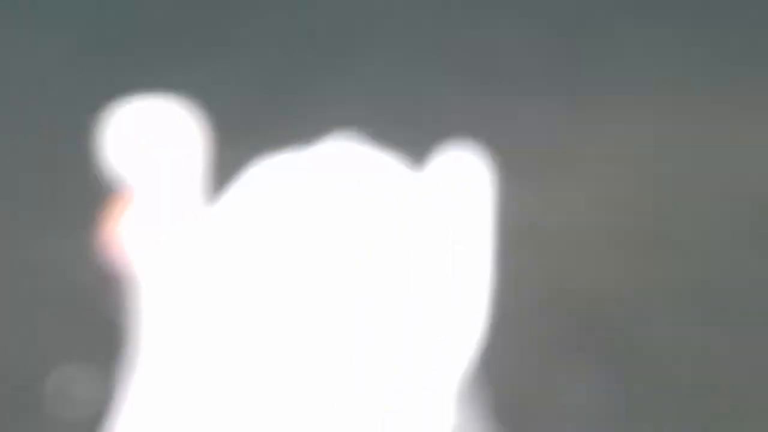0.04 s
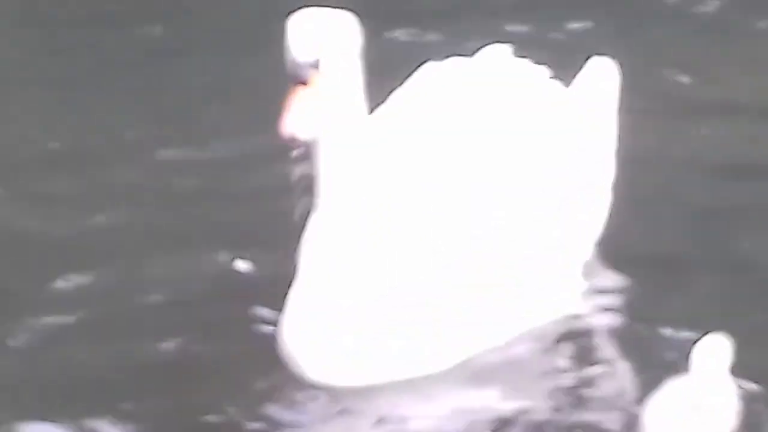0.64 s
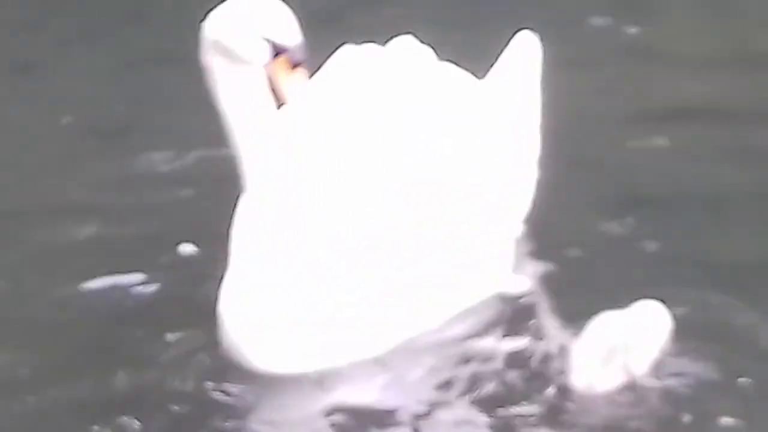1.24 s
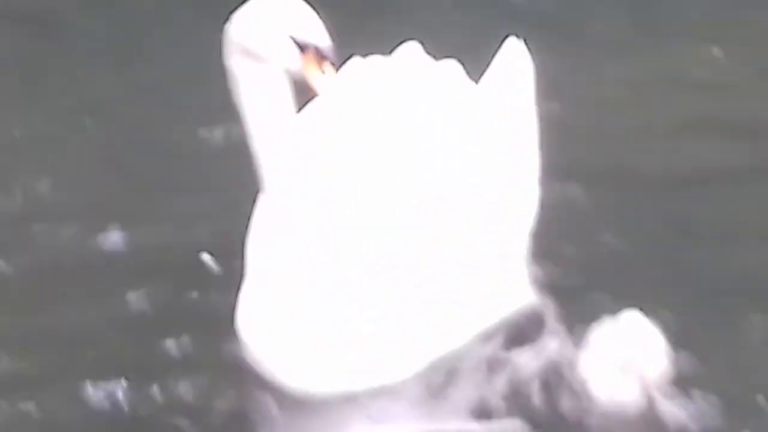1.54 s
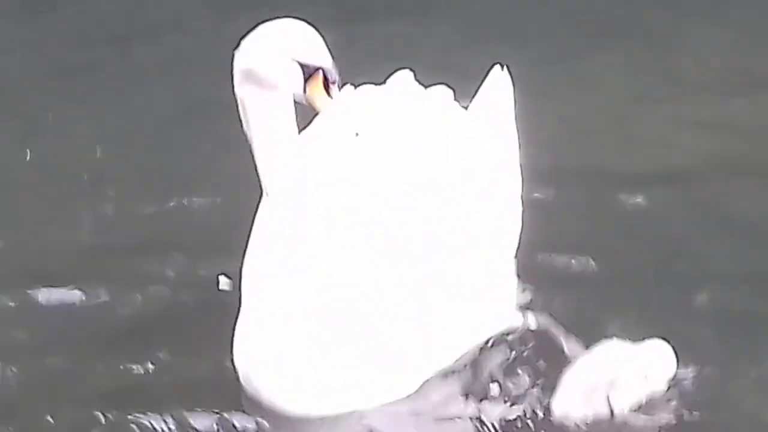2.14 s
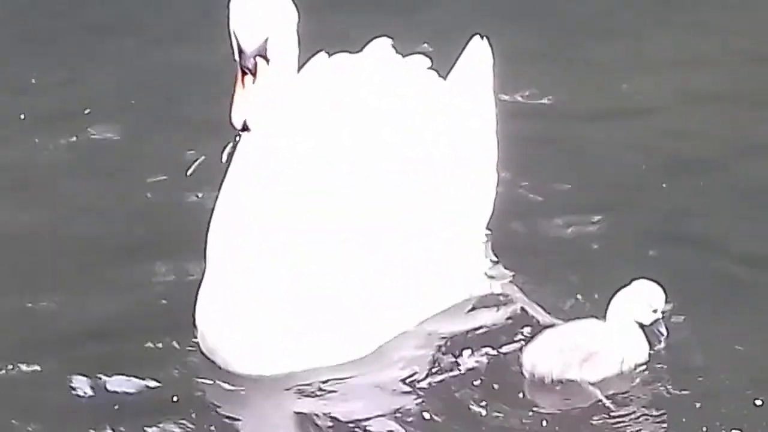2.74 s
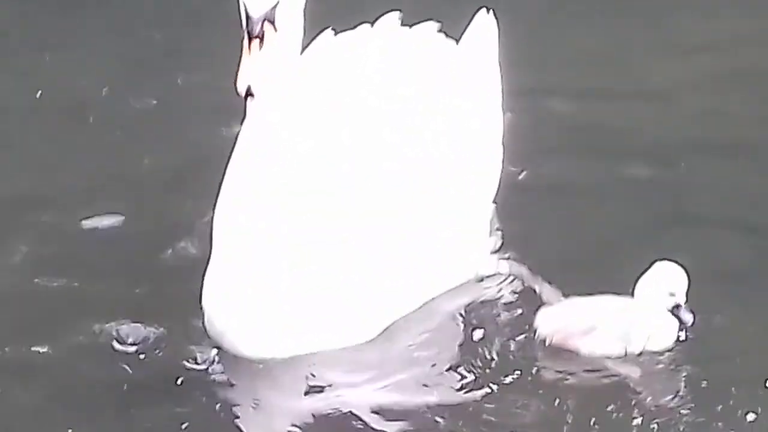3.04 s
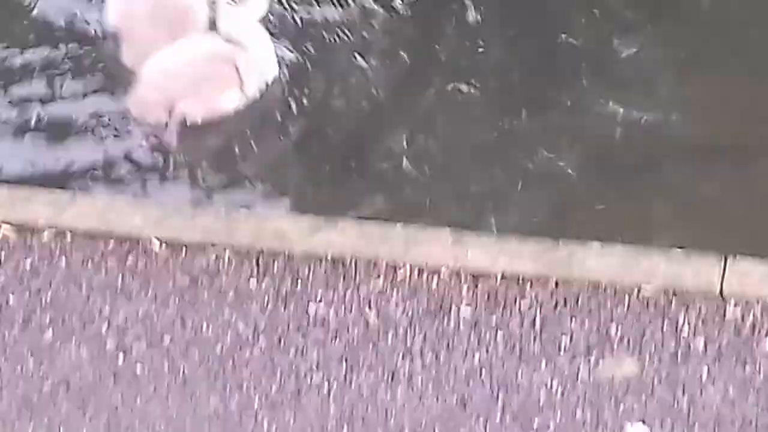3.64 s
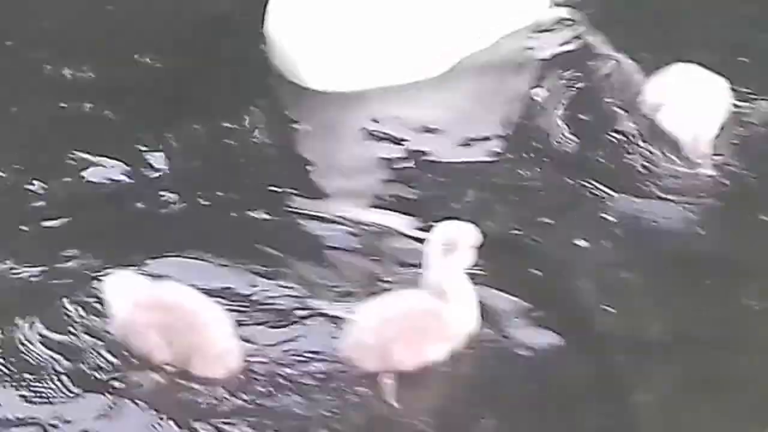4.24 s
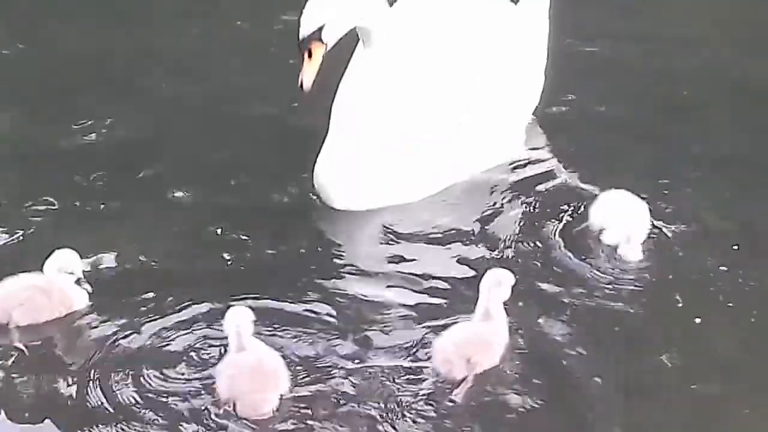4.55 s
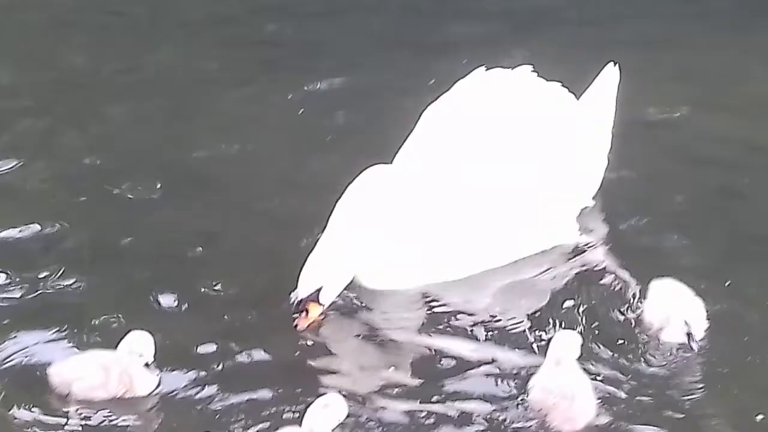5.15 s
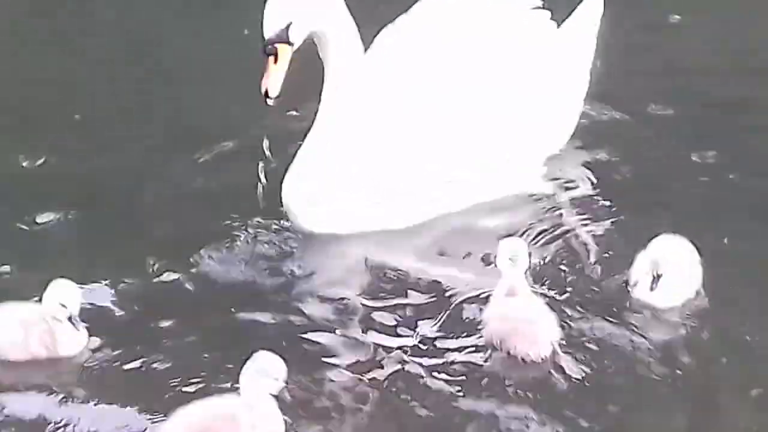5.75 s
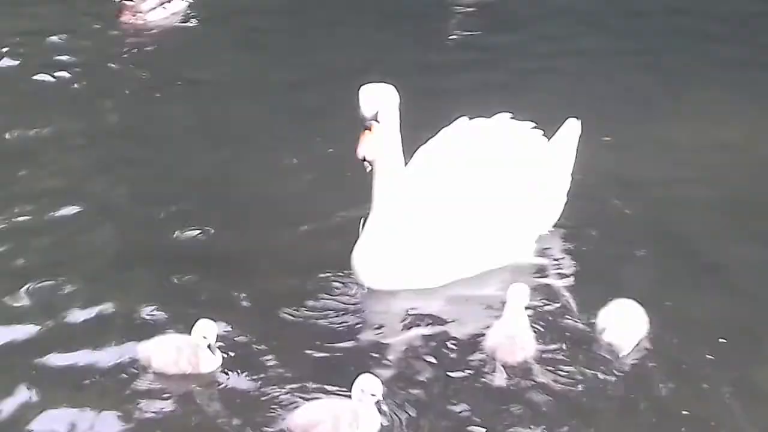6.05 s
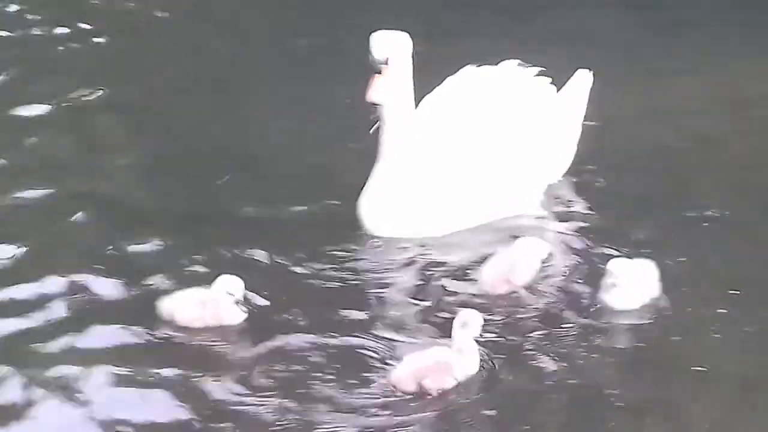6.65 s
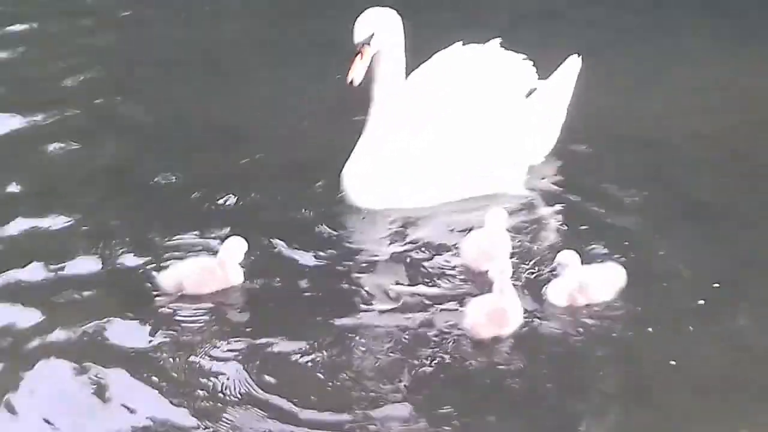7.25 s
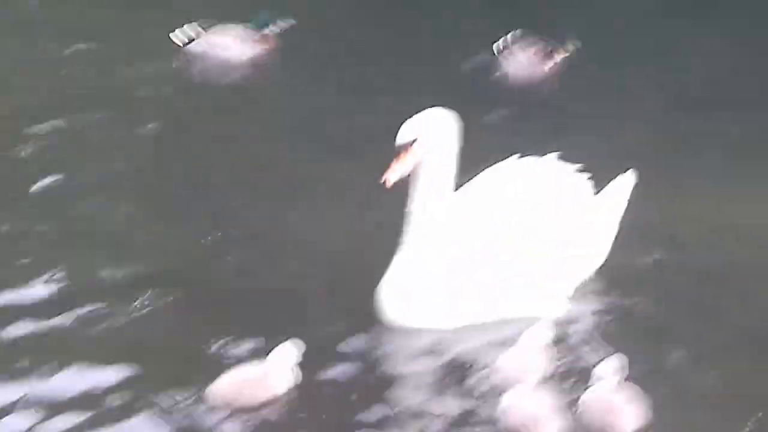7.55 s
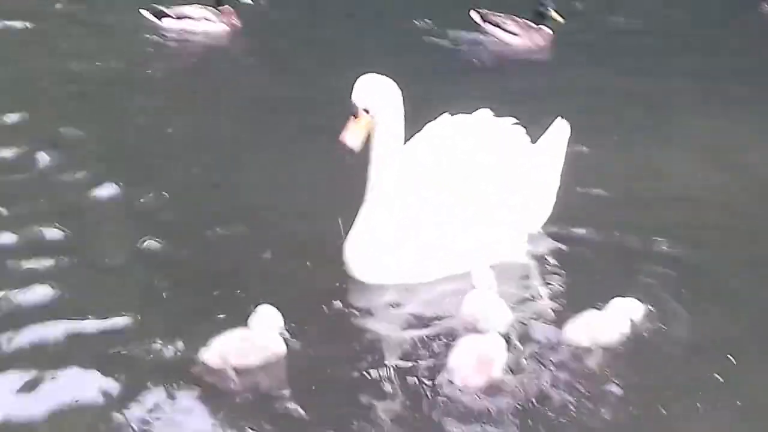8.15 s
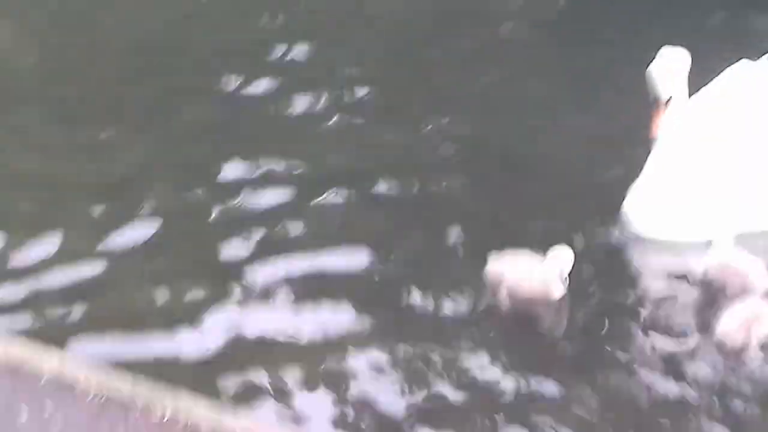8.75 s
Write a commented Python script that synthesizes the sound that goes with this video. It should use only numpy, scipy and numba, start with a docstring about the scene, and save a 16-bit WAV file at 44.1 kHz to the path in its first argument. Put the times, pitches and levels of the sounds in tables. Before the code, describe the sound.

Ducks quack in rapid, rasping chatter at a pond, with bill clicks, thin bird whistles and a few water plops.

```python
"""Ducks at a pond

Short rasping quacks, each a run of about 95 puffs a second ringing the windpipe and throat.
Bills click, more ducks answer further out, thin bird whistles and chirps glide over them, water plops.
Near the end the hand-held microphone is bumped and rubbed."""
import sys
import numpy as np
from scipy import signal
from scipy.fft import rfft, irfft, next_fast_len
from scipy.io import wavfile
from scipy.ndimage import uniform_filter1d
from numba import njit

SR = 44100
rng = np.random.default_rng(int(sys.argv[2]) if len(sys.argv) > 2 else 0)


def transcribe(u):
    """Save the signal u as a 16-bit wav file named by the first command-line argument.

    u: samples, shape (n,) or (channels, n), limited to [-1, 1]; the rate is SR.
    q: integer samples, one column per channel.
    """
    v = np.clip(np.atleast_2d(u).T, -1, 1)
    q = np.round(v * 32767).astype(np.int16)
    wavfile.write(sys.argv[1], SR, q)


N = 396459
TIME_S = np.arange(N) / SR

# (frequency [Hz], gain [dB])
VOICE_EQ = [(700, -16.5), (1300, -6), (1450, -5), (1650, 1), (2600, -1), (3100, -1.5), (3700, -5),
            (4400, 3), (5200, -5), (6200, -6), (7000, -16), (8000, -25.5), (11000, -42.5)]

def quack(length_s, puff_hz, throat_hz, bright_db, lag_ms, width_hz=418.0, leak=0.32):
    """Puffs of rasp ring windpipe and throat; resonances rise and fall as the bill opens and shuts."""
    t = np.arange(SR // 4) / SR - 1 / 8
    opening = np.cos(np.pi * np.clip(t / length_s, -.5, .5)) + 1e-9
    cycle = puff_hz * t * (1 - .5 * t) + .035 * wander(90, len(t)) + .5
    # successive puffs are alike, never identical
    rasp, fresh = rng.standard_normal((2, len(t)))
    repeated = rasp[(cycle % 1 * SR / puff_hz).astype(int)]
    source = np.sqrt(.79) * repeated + np.sqrt(.21) * fresh
    # windpipe echoes: a comb of nasal peaks
    lag_s = lag_ms / 1000 * (1 - .11 * (opening - .8))
    nasal = sum(.8 ** k * np.interp(t - k * lag_s, t, source) for k in range(3))
    voice = resonance(nasal, throat_hz * (1 + .27 * (opening - .8)), width_hz)
    # steady air pressure evens out the puffs
    power = np.abs(uniform_filter1d(voice ** 2, int(SR * .0049)))
    voice /= np.sqrt(power + 1e-12)
    puffs = leak + np.abs(np.sin(np.pi * cycle)) ** 1.68
    voice *= puffs * opening ** .93 * undb(1.75 * wander(90.1, len(t)))
    voice = colour(voice, VOICE_EQ)
    # treble peaks with the bill wide open
    body = colour(voice, [(2800, -2), (4000, -14)])
    voice = body + (voice - body) * undb(bright_db + 14 * (opening - 1.08))
    return voice / np.sqrt(np.sum(voice ** 2) / (length_s * SR))


# (centre [s], length [s], relative level [dB], puff rate [Hz], throat resonance [Hz], brightness [dB])
NEAR_QUACKS = [(0.024, 0.079, -32.5, 111, 2167, 4.5), (0.224, 0.077, -34, 82, 2060, 2),
               (0.424, 0.087, -45.5, 105, 3970, -23), (0.521, 0.085, -31, 102, 2290, 0),
               (0.647, 0.085, -40.5, 76, 3860, -24), (0.734, 0.1, -33, 91, 2140, -4),
               (0.909, 0.043, -40, 53, 1860, -14), (1.01, 0.091, -30.5, 105, 2275, 3.5),
               (1.093, .073, -29.5, 88, 2326, -16), (1.218, 0.12, -32.5, 84, 2160, 1.5),
               (1.433, 0.078, -44.5, 92, 3840, -19), (1.451, 0.22, -40, 95, 1640, -16),
               (1.644, 0.076, -28.5, 105, 2390, -6), (1.791, 0.042, -42.5, 69, 1730, -20),
               (1.909, 0.091, -39.5, 99, 2213, -7), (2.069, 0.068, -31.5, 62, 1830, -3),
               (2.155, 0.071, -32.5, 96, 2223, 2), (2.334, 0.085, -31, 85, 1960, 0),
               (2.578, 0.082, -31, 74, 1980, -3.5), (2.69, 0.069, -29.5, 83, 2300, 4.5),
               (2.766, 0.11, -40, 105, 2325, -22), (2.87, 0.086, -34.5, 74, 2317, -1.5),
               (2.919, 0.086, -32.5, 100, 2060, -2), (3.011, 0.085, -28.5, 93, 1840, -2),
               (3.154, .087, -31, 110, 2100, 5), (3.244, 0.075, -27, 111, 2100, 0.5),
               (3.393, 0.076, -29, 88, 2040, -1.5), (3.464, 0.072, -28.5, 98, 2010, -7.5),
               (3.687, 0.055, -27.5, 78, 2140, -8), (3.768, 0.062, -27, 80, 1950, -8),
               (3.976, 0.07, -30.5, 103, 2198, 5), (4.063, .1, -40.5, 86, 2180, -13),
               (4.179, .088, -26, 90, 2163, -0.5), (4.424, 0.074, -24, 97, 2186, -3),
               (4.588, 0.068, -27.5, 86, 1910, -15), (4.813, 0.061, -25.5, 92, 2015, -14),
               (5.028, 0.083, -27, 88, 1810, -4), (5.233, 0.088, -40, 65, 1660, 7),
               (5.397, 0.067, -28.5, 92, 1870, -5.5), (5.593, .1, -29.5, 89, 2050, 2),
               (5.776, 0.1, -36, 76, 2170, -10), (5.967, 0.1, -28.5, 71, 2005, -6),
               (6.162, 0.081, -27.5, 90, 1985, -8), (6.354, .1, -27.5, 82, 2010, -3),
               (6.565, 0.083, -36, 77, 1950, -9.5), (6.711, 0.074, -28, 95, 1910, -7),
               (6.914, 0.11, -29.5, 104, 1930, -4), (6.97, .074, -28.5, 110, 2316, -9),
               (7.037, 0.065, -36, 86, 2363, 2), (7.205, 0.086, -25.5, 110, 2494, -7),
               (7.285, 0.094, -29, 82, 1960, -3.5), (7.487, 0.066, -29, 66, 2000, -3),
               (7.792, 0.07, -32, 91, 2770, 0.5), (8.042, 0.068, -32.5, 108, 2390, 5),
               (8.363, 0.044, -40.5, 50, 1720, -2), (8.727, 0.15, -37, 102, 1900, 3),
               (8.938, 0.033, -38, 105, 2010, 9)]
# (throat resonance [Hz], echo lag [ms])
WINDPIPE_LAGS = [(1850, 1.0815), (2150, 1.149), (2380, 1.527), (3900, 0.936)]

def near_ducks(lag_scatter=0.14):
    """Ducks by the bank; the windpipe stretches a little differently for each quack."""
    out = np.zeros(N)
    stretches = 1 + lag_scatter * rng.uniform(-1, 1, len(NEAR_QUACKS))
    for (centre_s, length_s, db, puff_hz, throat_hz, bright_db), stretch in zip(NEAR_QUACKS, stretches):
        lag_ms = np.interp(throat_hz, *np.transpose(WINDPIPE_LAGS)) * stretch
        call = quack(length_s, puff_hz, throat_hz, bright_db, lag_ms)
        add(out, centre_s - 1 / 8, undb(db - 1) * call)
    return out


# (frequency [Hz], gain [dB])
BILL_EQ = [(1000, -26), (2500, -6), (4600, 3.5), (6000, -18.5), (8000, -22), (14000, -60)]

def bills(lead_s=0.045, scatter_db=8.5, stray_count=16):
    """The bill snaps open ahead of each near quack's centre; feeding birds add stray clicks."""
    offsets_db = -9 + scatter_db * rng.uniform(-1, 1, len(NEAR_QUACKS))
    snaps = [(centre_s - lead_s, db + offset_db)
             for (centre_s, _, db, *_), offset_db in zip(NEAR_QUACKS, offsets_db)]
    strays = [(when * N / SR, -38 - scatter_db * soft) for when, soft in rng.random((stray_count, 2))]
    return clicks(snaps, BILL_EQ, decay_s=0.0031) + clicks(strays, BILL_EQ, decay_s=0.0015)


# (time [s], relative level [dB])
FLOCK_LEVELS = [(0, -40), (1.4, -47.5), (1.7, -50.5), (2.0, -38.5), (2.5, -47), (3.4, -46), (4.0, -43.5),
                (4.9, -38.5), (5.4, -42), (6.25, -48.5), (7.1, -44.5), (7.4, -56.5), (7.62, -40),
                (7.75, -53.5), (8.99, -47)]

def far_ducks(count=70):
    """Overlapping quacks across the water, duller, each with its own voice."""
    out = np.zeros(N)
    for k, (when, length, rate, throat, lag, loud) in enumerate(rng.uniform(-1, 1, (count, 6))):
        call = quack(length_s=.15 + .08 * length, puff_hz=95 + 14 * rate,
                     throat_hz=1950 * (1 + .17 * throat), bright_db=-9,
                     lag_ms=1.2 + .3 * lag, width_hz=700.0, leak=.077)
        start_s = (k + when / 4) / count * N / SR - 1 / 16
        add(out, start_s, undb(2 * loud) * call)
    return unit(out) * undb(np.interp(TIME_S, *np.transpose(FLOCK_LEVELS)) - 1)


# (start [s], length [s], fundamental [Hz], climb [share of pitch], relative level [dB])
WHISTLE_CALLS = [(0.036, 0.63, 1266, 0.099, -54), (1.099, 0.47, 1057, 0.025, -47),
                 (2.19, 0.52, 1240, 0.036, -52.5), (3.503, 0.44, 1130, -0.054, -56),
                 (4.232, 0.27, 1130, 0.042, -52), (5.10, 0.56, 1133, -0.048, -52),
                 (6.406, .25, 1150, 0, -51.5), (7.871, 0.26, 1162, .17, -47)]
# (frequency [Hz], gain [dB])
THROAT_EQ = [(1900, 3), (2250, -1), (2600, -9), (3200, -28), (3450, -17), (3700, -3), (4000, -9.5),
             (4400, -6), (5400, -13.5)]

def whistles(scoop_s=0.028, droop_s=0.022, waver_hz=4.2, flutter_db=3.0):
    """Thin calls scoop up, waver along a slow glide and droop; the throat picks out harmonics 2-4."""
    out = np.zeros(N)
    throat_hz, throat_db = np.transpose(THROAT_EQ)
    for start_s, length_s, pitch_hz, climb, db in WHISTLE_CALLS:
        t = np.arange(int(length_s * SR)) / SR
        u = t / length_s
        scoop = .0389 * np.exp(-t / scoop_s)
        droop = .27 * np.exp((t - length_s) / droop_s)
        waver = .0223 * np.sin(2 * np.pi * waver_hz * t) + .005 * wander(150, len(t))
        hz = pitch_hz * (1 + climb * (u - .5) - scoop - droop + waver)
        phase = 2 * np.pi * np.cumsum(hz) / SR
        tone = sum(undb(np.interp(np.log(k * hz), np.log(throat_hz), throat_db)) * np.sin(k * phase)
                   for k in range(2, 5))
        fade = np.sqrt(np.minimum(1, 8 * np.minimum(u, 1 - u)))
        add(out, start_s, tone * fade * undb(db + flutter_db * wander(40, len(t))))
    return out


# (start [s], length [s], from [Hz], to [Hz], peak [dB])
CHIRP_GLIDES = [(0.33, 0.054, 3150, 2450, -42), (2.439, 0.031, 3500, 2350, -43),
                (5.398, .085, 2870, 2150, -48), (7.565, 0.092, 1850, 2780, -46),
                (7.663, 0.096, 1885, 2110, -39.5)]

def chirps(jitter=0.006):
    """Small birds: quick glides of one clear tone."""
    out = np.zeros(N)
    for start_s, length_s, from_hz, to_hz, db in CHIRP_GLIDES:
        u = np.linspace(0, 1, int(length_s * SR))
        hz = from_hz * (to_hz / from_hz) ** u * (1 + jitter * wander(300, len(u)))
        tone = np.sin(2 * np.pi * np.cumsum(hz) / SR)
        add(out, start_s, undb(db) * np.sin(np.pi * u) * tone)
    return out


# (centre [s], pitch [Hz], length [s], peak [dB])
WATER_PLOPS = [(2.979, 960, 0.011, -36), (3.0245, 418, 0.015, -26.5), (3.104, 480, 0.0039, -32),
               (3.110, 790, 0.023, -38), (7.35, 422, 0.067, -48), (8.755, 470, 0.034, -39.5)]

def plops():
    """Water plops in short, sinking tones."""
    return thuds(WATER_PLOPS, sink=0.29)


# (centre [s], pitch [Hz], length [s], peak [dB])
CASE_BUMPS = [(7.758, 111, 0.02, -41), (7.852, 118, 0.017, -38.5), (8.001, 118, .034, -43.5)]

def case_bumps():
    """Fingers bump the microphone case: low thuds."""
    return thuds(CASE_BUMPS, sink=0.43)


# (time [s], relative peak [dB])
CRACKLE_AND_TICK = [(7.6035, -34), (7.617, -38), (7.6185, -36), (7.620, -26.5), (7.6378, -19)]
# (frequency [Hz], gain [dB])
TICK_EQ = [(1500, -38), (4200, 9), (7000, -14), (9000, -8), (10000, -25), (11000, -10), (14500, -6),
           (16000, -5)]

def tick():
    """Faint crackle just before one sharp tick."""
    return undb(1) * clicks(CRACKLE_AND_TICK, TICK_EQ, decay_s=0.0005)


# (start [s], length [s], level [dB])
SLEEVE_STROKES = [(8.203, 0.15, -51), (8.297, .15, -41), (8.455, .31, -40), (8.767, 0.31, -45.5)]
# (frequency [Hz], gain [dB])
SLEEVE_EQ = [(1500, -13.5), (3000, -5.5), (4200, 2), (5200, -9), (7000, -17), (9000, -25), (10000, -33),
             (11500, -28), (14300, -32), (16000, -39)]

def sleeve(attack_s=0.098, release_s=0.042, grain_db=2.5):
    """Cloth fibres catch and slip past the microphone in a fine hiss; strokes swell, hold and fade."""
    fibres = rng.standard_normal(N)
    fibres *= undb(grain_db * unit(uniform_filter1d(rng.standard_normal(N), size=90)))
    pressure = np.zeros(N)
    for start_s, length_s, db in SLEEVE_STROKES:
        swell = np.clip((TIME_S - start_s) / attack_s, 0, 1) ** 2
        fade = np.exp(-np.maximum(TIME_S - start_s - length_s, 0) / release_s)
        pressure += undb(db) * swell * fade
    return unit(colour(fibres, SLEEVE_EQ)) * pressure * undb(wander(25, N))


def diffuse_tail(x, t60_s=0.82, onset_s=0.0044, wet_db=-20):
    """Faint, diffuse decay after each sound."""
    t = np.arange(SR) / SR
    tail = rng.standard_normal(SR) * undb(-60 * t / t60_s) * np.clip(t / onset_s, 0, 1)
    tail = colour(tail, [(2000, 4.1), (7000, 10)])
    return undb(wet_db) * signal.fftconvolve(x, tail / np.linalg.norm(tail))[:N]


# (frequency [Hz], gain [dB])
AIR_EQ = [(25, -28.5), (60, -2), (130, -2), (250, 0), (480, -3), (720, 4), (1300, -1), (2200, -11),
          (3200, -16), (4400, -15.5), (6000, -30.5), (8500, -36.5), (12000, -35.5), (15500, -35)]

def air(level_db=-47.5):
    """Soft, gently swelling wash of distant water and leaves."""
    wash = unit(colour(rng.standard_normal(N), AIR_EQ))
    return wash * undb(level_db + .55 * wander(1.98, N) + .63 * wander(14, N))


def clicks(rows, eq, decay_s):
    """Brief cracks of decaying noise."""
    out = np.zeros(N)
    t = np.arange(2048) / SR - .002
    for time_s, db in rows:
        burst = rng.standard_normal(len(t)) * (t >= 0) * np.exp(-np.abs(t) / decay_s)
        crack = colour(burst, eq)
        add(out, time_s + t[0], undb(db) * crack / np.abs(crack).max())
    return out


def thuds(rows, sink):
    """Soft pulses of sinking pitch."""
    out = np.zeros(N)
    for centre_s, hz, length_s, db in rows:
        u = np.linspace(-.5, .5, int(length_s * SR))
        tone = np.cos(2 * np.pi * hz * length_s * u * (1 - sink * u))
        add(out, centre_s - length_s / 2, undb(db) * np.cos(np.pi * u) ** 2 * tone)
    return out


@njit
def resonance(x, centre_hz, width_hz):
    """State-variable band-pass with a moving centre."""
    y = np.empty(len(x))
    band_state, low_state = 0., 0.
    for i in range(len(x)):
        g = np.tan(np.pi * centre_hz[i] / SR)
        damping = width_hz / centre_hz[i]
        band = (band_state + g * (x[i] - low_state)) / (1 + g * (g + damping))
        band_state = 2 * band - band_state
        low_state += 2 * g * band
        y[i] = damping * band
    return y


def colour(x, eq):
    """Filter by (frequency [Hz], gain [dB]) points."""
    hz, db = np.transpose(eq)
    size = next_fast_len(len(x) + 512)
    bins_hz = np.maximum(np.fft.rfftfreq(size, 1 / SR), 1)
    gain = undb(np.interp(np.log(bins_hz), np.log(hz), db))
    return irfft(rfft(x, size) * gain, size)[:len(x)]


def wander(rate_hz, count):
    """Smooth random drift, spread about 1."""
    steps = np.arange(count) / SR * rate_hz
    return 1.2 * np.interp(steps, np.arange(256), rng.standard_normal(256))


def add(out, start_s, x):
    """Mix x into out from start_s."""
    start = int(start_s * SR)
    lo, hi = max(start, 0), min(start + len(x), N)
    if hi > lo:
        out[lo:hi] += x[lo - start:hi - start]


def undb(db):
    """Decibels to gain."""
    return 10 ** (np.asarray(db) / 20)


def unit(x):
    """Scale to rms 1."""
    return x / np.sqrt(np.mean(x ** 2) + 1e-18)


def scene():
    """Birds, water and handling noise; nearly mono, with a faint diffuse spread of the pond sounds."""
    pond = near_ducks() + bills() + whistles() + chirps() + plops()
    close = case_bumps() + tick() + sleeve()
    mid = pond + diffuse_tail(pond) + far_ducks() + air() + close
    stereo_spread = undb(-40.5) * diffuse_tail(pond)
    hiss_eq = [(25, -10), (80, -4), (400, -.5), (1500, -14.5), (6000, -14), (15000, -16)]
    side = stereo_spread + undb(-71) * unit(colour(rng.standard_normal(N), hiss_eq))
    return np.array([mid + side, mid - side])


def record(dry, cutoff_hz=15800):
    """Steep low-pass of the recorder."""
    return signal.sosfilt(signal.ellip(8, .2, 70, cutoff_hz, fs=SR, output="sos"), dry)


dry = scene()
out = record(dry)
transcribe(out)
```